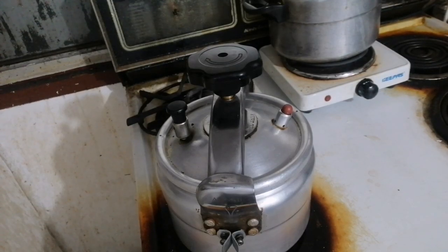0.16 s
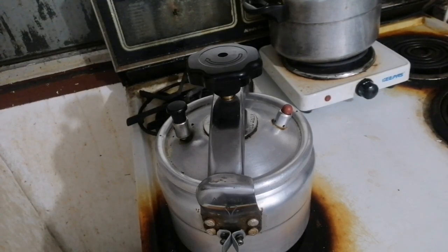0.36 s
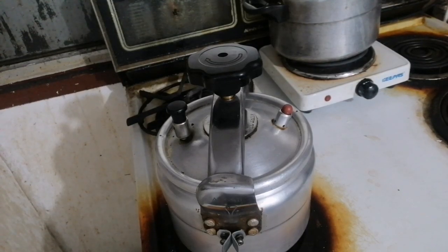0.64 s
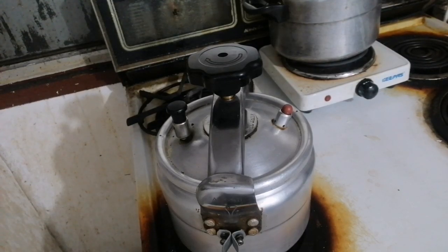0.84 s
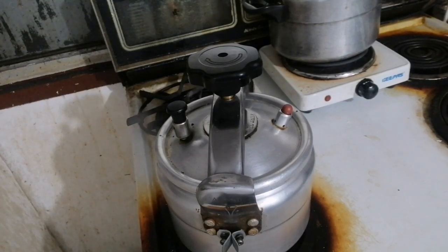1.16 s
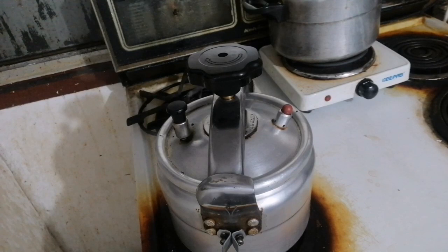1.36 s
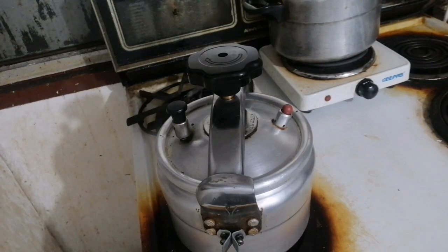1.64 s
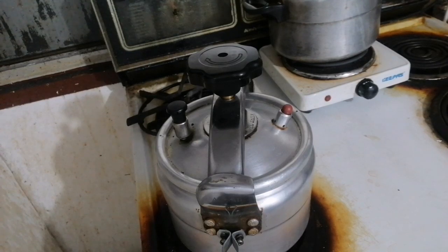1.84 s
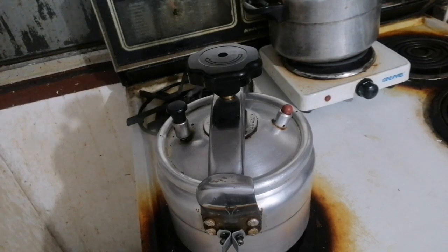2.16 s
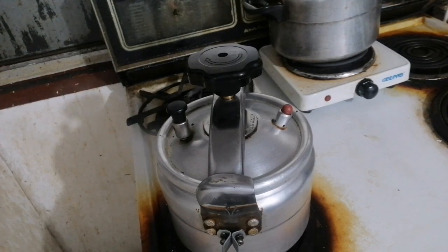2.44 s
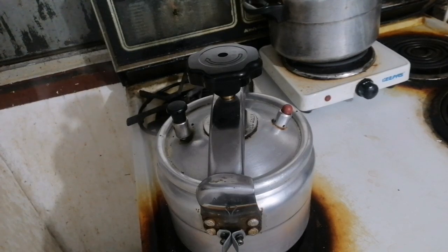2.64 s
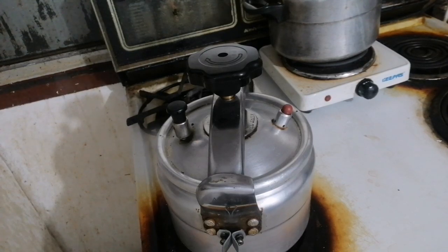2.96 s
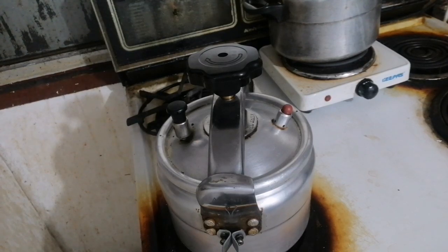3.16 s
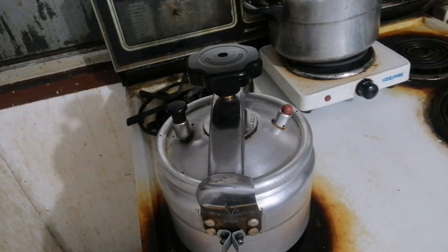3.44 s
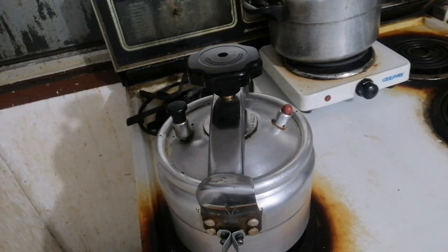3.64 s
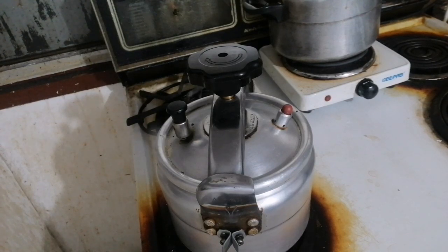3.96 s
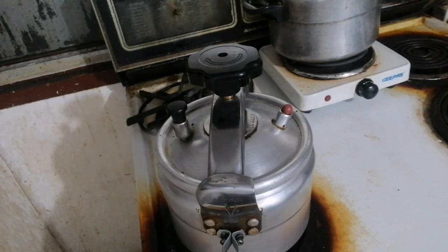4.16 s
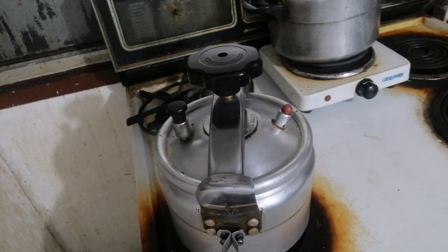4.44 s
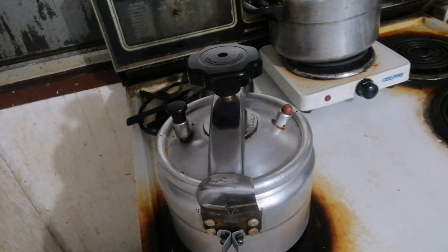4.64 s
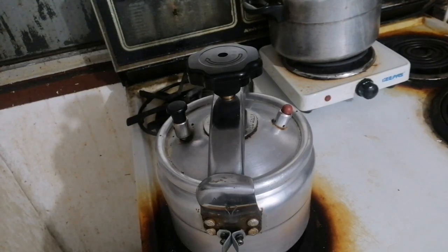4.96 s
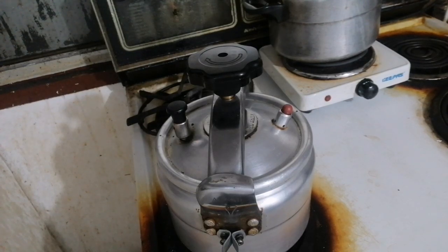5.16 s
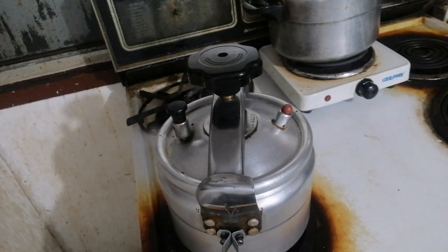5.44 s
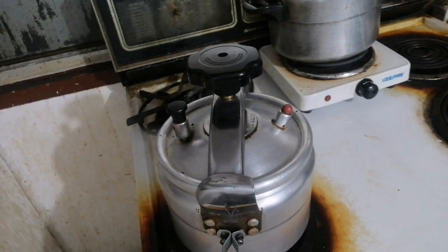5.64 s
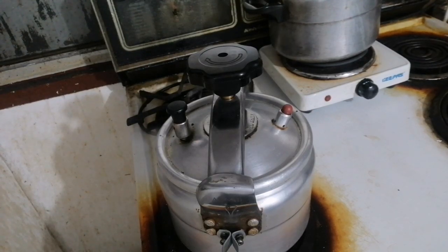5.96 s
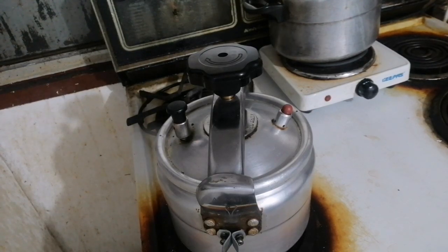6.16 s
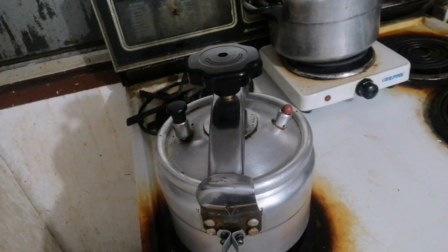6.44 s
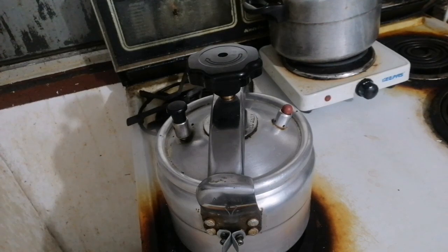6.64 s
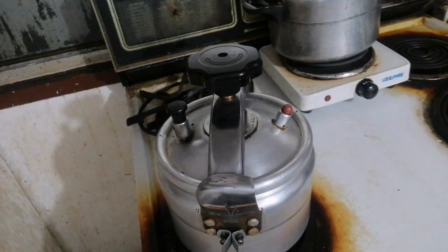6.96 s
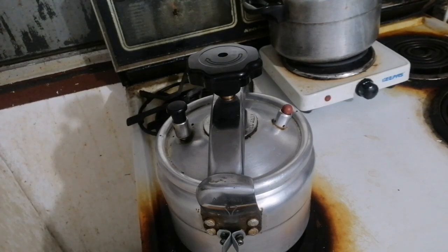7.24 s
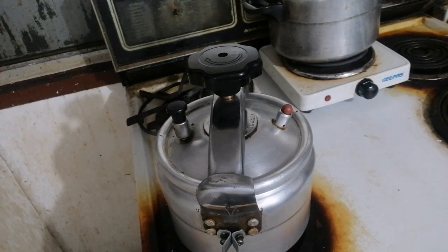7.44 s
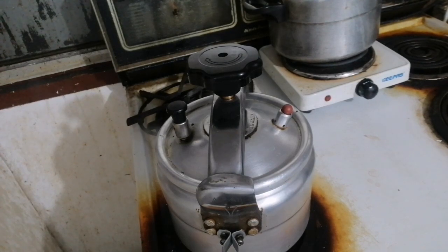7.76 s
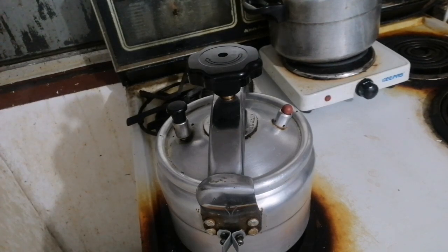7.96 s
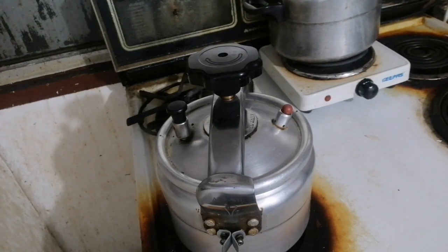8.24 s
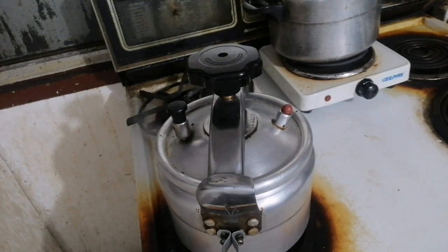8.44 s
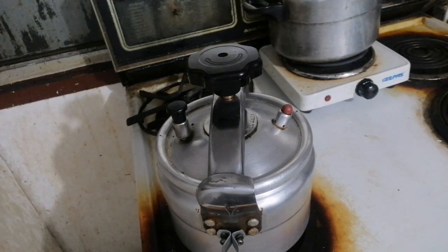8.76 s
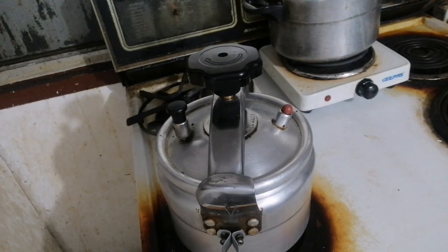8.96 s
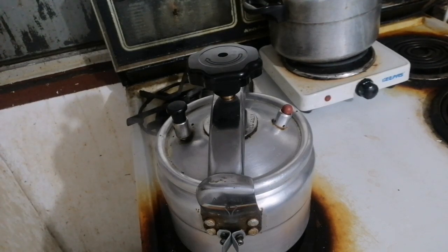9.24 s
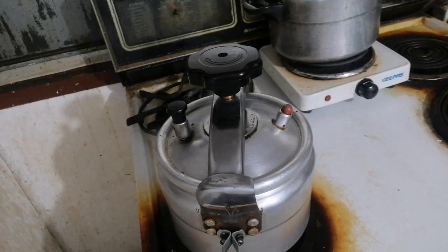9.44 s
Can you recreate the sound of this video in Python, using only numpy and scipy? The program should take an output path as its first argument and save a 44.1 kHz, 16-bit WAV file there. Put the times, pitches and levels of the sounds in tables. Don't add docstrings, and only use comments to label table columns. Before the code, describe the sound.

From 0 to about 9.5 seconds a pressure cooker valve vents an unbroken jet of steam: bright, dense hiss concentrated in the upper treble, about 5 to 12 kHz, with fine rapid flutter and a nearly imperceptible fall of about one decibel. The stereo is wide, each side coloured differently, with tight, quickly fading kitchen reflections. Far below it, the boil rumbles around 75 and 156 Hz in short irregular surges over dull house noise. Faint distant thuds come at 1.15, 1.7 and 2.2 seconds, a clearer ringing tap at 2.8, a deep thud at 2.9, another at 3.1, and a soft hollow wooden cupboard knock at 3.3. Very faint thuds follow at 5.8 and 7.4. From 8.3 something heavy drags far off in short low pulls, nearly masked, with a broad thud at 9.3. The hiss continues to the end.

```python
import sys
import numpy as np
from scipy import signal
from scipy.fft import rfft, irfft, next_fast_len
from scipy.io import wavfile

SR = 44100
rng = np.random.default_rng(int(sys.argv[2]) if len(sys.argv) > 2 else 0)


def voltage_ratio(level):
    return 10 ** (np.asarray(level, float) / 20)


def store_wav(level_fs):
    pcm = np.round(np.clip(np.atleast_2d(level_fs), -1, 1) * 32767)
    wavfile.write(sys.argv[1], SR, pcm.T.astype(np.int16))


N = 422919
SIZE = next_fast_len(N + SR)
HZ = np.maximum(np.arange(SIZE // 2 + 1) * SR / SIZE, 1)
PORT_SIGN = np.array([[1], [-1]])


def rms_one(x):
    return x / np.sqrt(np.mean(x ** 2) + 1e-20)


def at_hz(points):
    hz, value = np.array(points).T
    return np.interp(np.log(HZ), np.log(hz), value)


def drift(rate):
    r = np.exp(-80 * np.pi * rate / SR)
    slow = signal.lfilter([1], [1, -2 * r, r * r], rng.standard_normal(N // 40 + 2002))
    slow = rms_one(slow[2000:])
    return np.interp(np.arange(N) / 40, np.arange(len(slow)), slow)


def resonant_noise(hz, width):
    r = np.exp(-np.pi * width / SR)
    poles = [1, -2 * r * np.cos(2 * np.pi * hz / SR), r * r]
    once = signal.lfilter([1, 0, -1], poles, rng.standard_normal(N))
    return rms_one(signal.lfilter([1, 0, -1], poles, once))


def swells(rows, edge_s, rest_db):
    t = np.arange(0, N + 40, 40) / SR
    power = voltage_ratio(rest_db) ** 2
    for start, length, db in rows:
        rise = np.tanh((t - start) / edge_s)
        fall = np.tanh((t - start - length) / edge_s)
        power = power + voltage_ratio(db) ** 2 * (rise - fall) / 2
    return np.interp(np.arange(N) / SR, t, np.sqrt(power))


def turbulence(upper_db, together_db, patchy_db):
    white = rfft(rng.standard_normal(SIZE))
    together = 0.32 * drift(11.0) + 0.71 * drift(33)
    centres = np.log(np.geomspace(500, 15000, num=12))
    out = np.zeros(SIZE)
    for k, centre in enumerate(centres):
        share = np.interp(np.log(HZ), centres, np.arange(len(centres)) == k)
        band = irfft(white * share, SIZE)
        gain_db = together_db * together + patchy_db * drift(9.7)
        gain_db = gain_db + upper_db * (centre > np.log(7500))
        out += band * np.resize(voltage_ratio(gain_db), SIZE)
    return rfft(out)


KITCHEN_T60_S = 0.08


def walls():
    t = np.arange(SR // 2) / SR
    echoes = rng.standard_normal(len(t)) * voltage_ratio(-60 * t / KITCHEN_T60_S) * (t > 0.0015)
    return rfft(echoes / np.sqrt(np.sum(echoes ** 2)), SIZE)


def port(colour, ripples):
    gain_db = at_hz(colour)
    for hz, width, db in ripples:
        gain_db = gain_db + db / (1 + (2 * (HZ - hz) / width) ** 2)
    return voltage_ratio(gain_db)


# f/Hz, level/dB (per Hz)
LEFT_COLOUR = [(300, -33), (1000, -33), (2000, -28), (2500, -18.5), (3300, -14), (4500, -12), (5500, -3),
               (6500, -0.5), (7200, -5), (7600, -10), (8600, -18.5), (11800, -12), (13000, -16.5),
               (15000, -10.5)]
RIGHT_COLOUR = [(300, -31.5), (1000, -32), (1900, -36), (2600, -19), (3900, -37), (4700, -13.5),
                (6000, -16), (7500, -11), (8500, -8), (9000, 0), (10200, -2), (10600, -6.5), (12400, -9),
                (15100, -11)]
# f/Hz, width/Hz, level/dB
LEFT_STANDING = [(4700, 66, -9), (5747, 155, 4.5), (8000, 300, 6.5), (9260, 390, 5), (11480, 150, -1),
                 (14100, 270, -6), (14700, 200, 4.5), (14530, 180, 6.5), (15400, 300, -5), (1070, 100, -1),
                 (1530, 130, 1), (7800, 530, -2), (2376, 150, -18.5)]
RIGHT_STANDING = [(3220, 190, -2), (4470, 360, -4), (8440, 180, 0), (10030, 200, 5), (11040, 230, 0.5),
                  (11250, 300, 4.5), (12070, 230, 4.5), (15400, 300, 0), (1050, 440, -4.5), (1600, 125, 10),
                  (14950, 350, -2), (3490, 230, 18), (14400, 300, 1)]
# f/Hz, lag of the left/rad
LEFT_PHASE_LAG = [(300, 0.14), (2900, 0.3), (3300, 1.34), (4500, 1.85), (5800, 2.12), (6300, 3.86),
                  (7400, 5.1), (8600, 4.9), (10000, 4.04), (11500, 4.94), (12300, 2), (13000, 4.7),
                  (15000, 3.7)]
JET_DB, JET_SAG_DB_PER_S = -28.5, 0.0976
UPPER_WANDER_DB = 0.5
WALLS_DB, STRAY_DB = -7, 1.5


def steam():
    jet = turbulence(UPPER_WANDER_DB * drift(0.64), together_db=0.89, patchy_db=0.94)
    left = (port(LEFT_COLOUR, LEFT_STANDING), np.exp(-1j * at_hz(LEFT_PHASE_LAG)))
    right = (port(RIGHT_COLOUR, RIGHT_STANDING), 1)
    heard = []
    for gain, lag in (left, right):
        direct_and_walls = jet * (lag + voltage_ratio(WALLS_DB) * walls())
        eddies = voltage_ratio(STRAY_DB) * rfft(rng.standard_normal(SIZE))
        heard.append(gain * (direct_and_walls + eddies))
    level_db = JET_DB - JET_SAG_DB_PER_S * np.arange(N) / SR
    return voltage_ratio(level_db) * rms_one(irfft(np.array(heard), SIZE)[:, :N])


# f/Hz, level/dB (per Hz)
HOUSE_COLOUR = [(12, -47), (20, -22), (32, -18), (51, -4), (69, -0.5), (102, -12.5), (161, -9.5),
                (215, -17.5), (346, -24), (900, -30.5), (1170, -47), (1980, -120)]
# f/Hz, likeness (0 to 1)
HOUSE_LIKENESS = [(40, 0.89), (150, 1), (300, 0.74), (800, 0.19)]
HOUSE_DB, HOUSE_TILT_DB = -65, 0.6


def house_noise():
    mid, side = rfft(rng.standard_normal((2, SIZE)))
    alike = np.clip(at_hz(HOUSE_LIKENESS), 0, 1)
    both = np.sqrt(1 + alike) * mid + np.sqrt(1 - alike) * side * PORT_SIGN
    noise = irfft(both * voltage_ratio(at_hz(HOUSE_COLOUR)), SIZE)[:, :N]
    level_db = HOUSE_DB + HOUSE_TILT_DB * PORT_SIGN + 0.73 * drift(3.2)
    return voltage_ratio(level_db) * rms_one(noise)


# f/Hz, width/Hz
KITCHEN_MODES = [(75, 22.06), (156, 30)]
# t/s, length/s, level/dB
LOW_MODE_SURGES = [(0.275, 0.096, -57.5), (0.479, 0.1, -59), (0.643, 0.04, -59), (0.78, 0.054, -59),
                   (0.9, 0.03, -63), (1.046, 0.085, -59), (1.201, 0.038, -58), (1.477, 0.102, -57),
                   (1.632, 0.179, -61), (1.89, 0.36, -58.5), (2.508, 0.23, -55), (2.891, 0.1, -60),
                   (3.089, 0.65, -60), (3.903, 0.044, -59), (4.083, 0.33, -56), (4.578, 0.6, -58),
                   (5.256, 0.25, -60), (6.449, 0.22, -59), (6.982, 0.28, -59), (7.575, 0.193, -58),
                   (7.9, 0.142, -58), (8.748, 0.102, -59), (9.018, 0.21, -59), (9.481, 0.046, -58)]
# t/s, length/s, level/dB
HIGH_MODE_SURGES = [(0.064, 0.159, -65), (0.449, 0.034, -60), (0.818, 0.24, -67), (1.447, 0.041, -62),
                    (1.71, 0.15, -65.5), (2.014, 0.034, -63), (2.341, 0.058, -61), (2.548, 0.03, -63),
                    (2.77, 0.39, -65), (3.281, 0.17, -65), (3.57, 0.4, -63), (4.173, 0.29, -69),
                    (4.634, 0.155, -64.5), (5.172, 0.151, -66), (5.46, 0.175, -63.5), (5.905, 0.05, -62),
                    (6.775, 0.21, -69), (7.173, 0.39, -67.5), (7.896, 0.095, -61.5), (8.652, 0.175, -63),
                    (9.078, 0.032, -64), (9.429, 0.04, -63)]
SIMMER_LEVELS = [-70.5, -77]
SURGE_EDGE_S, SURGE_LUMPS_DB = 0.024, 1


def rumble():
    out = 0
    both_surges = (LOW_MODE_SURGES, HIGH_MODE_SURGES)
    for surges, rest_db, (hz, width) in zip(both_surges, SIMMER_LEVELS, KITCHEN_MODES):
        phase = 2 * np.pi * np.cumsum(hz + 0.3 * width * drift(8.17)) / SR
        lumps = voltage_ratio(SURGE_LUMPS_DB * drift(2.1) - 2.0)
        gain = swells(surges, SURGE_EDGE_S, rest_db) * lumps
        out += gain * rms_one(np.sin(phase) + 0.42 * resonant_noise(hz, width))
    return out


# t/s, peak level/dB, low f/Hz, high f/Hz, t60/s
THUDS = [
    (1.15, -51.5, 200, 450, 0.22),
    (1.7, -50.5, 400, 1000, 0.31),
    (2.19, -49, 900, 1900, 0.27),
    (2.81, -38.5, 2570, 2840, 0.77),
    (2.91, -47, 140, 328, 0.19),
    (3.06, -53, 700, 950, 0.77),
    (3.284, -46, 330, 756, 0.61),
    (5.801, -54, 160, 520, 0.9),
    (7.36, -54, 110, 280, 0.27),
    (9.28, -49.5, 350, 1720, 1),
]
RISE_SHARE = 0.019


def thuds():
    out = np.zeros((2, N + SR))
    t = np.arange(SR // 2) / SR
    for start, peak_db, low_hz, high_hz, t60 in THUDS:
        mid, side = rng.standard_normal((2, len(t)))
        both = mid + 0.5 * side * PORT_SIGN
        band = signal.butter(4, [low_hz, high_hz], "band", fs=SR, output="sos")
        puff = rms_one(signal.sosfilt(band, both))
        swell = 1 - np.exp(-t / (RISE_SHARE * t60))
        first = round(start * SR)
        out[:, first:first + len(t)] += voltage_ratio(peak_db - 7 - 60 * t / t60) * swell * puff
    return out[:, :N]


# f/Hz, level/dB, t60/s
CUPBOARD_MODES = [(260, -9.5, .2), (1330, -9, 0.054), (380, 5, 0.07), (494, -18, 0.2), (552, 9, 0.065),
                  (635, 2, 0.06), (743, -2, 0.075), (854, 2, 0.071)]
KNOCK_S, KNOCK_DB = 3.268, -43
ECHO_S, ECHO_DB = 0.026, -6


def knock():
    t = np.maximum(np.arange(N) / SR - KNOCK_S, 0)
    ring = sum(voltage_ratio(db - 60 * t / t60) * np.sin(2 * np.pi * hz * t) for hz, db, t60 in CUPBOARD_MODES)
    soft_onset = (1 - np.exp(-t / 0.0045)) ** 2
    ring = voltage_ratio(KNOCK_DB) * soft_onset * ring
    return sum(voltage_ratio(k * ECHO_DB) * np.roll(ring, round(k * ECHO_S * SR)) for k in range(3))


# t/s, length/s, level/dB
DRAG_PULLS = [
    (8.28, 0.39, -64),
    (8.647, 0.086, -65),
    (8.755, 0.16, -64),
    (8.925, 0.066, -66),
    (9.16, 0.104, -66),
    (9.326, 0.12, -67),
    (9.488, 0.12, -61.5),
]
# f/Hz, width/Hz, level/dB
DRAG_BODY = [(304, 54, -3.5), (372, 64, 2.5), (474, 72, -16)]
PULL_EDGE_S, PULL_JUDDER_DB = 0.036, 3


def drag():
    judder = voltage_ratio(PULL_JUDDER_DB * drift(14) - 2.5)
    gain = swells(DRAG_PULLS, PULL_EDGE_S, rest_db=-120) * judder
    scrape = sum(voltage_ratio(db) * resonant_noise(hz, width) for hz, width, db in DRAG_BODY)
    return gain * rms_one(scrape)


def scene():
    low = (rumble() + knock() + drag()) * voltage_ratio(0.7 * PORT_SIGN)
    return steam() + house_noise() + low + thuds()


def roll_off(x):
    return signal.sosfilt(signal.butter(12, 15500, fs=SR, output="sos"), x)


def record(dry):
    return roll_off(dry)


dry = scene()
out = record(dry)
store_wav(out)
```